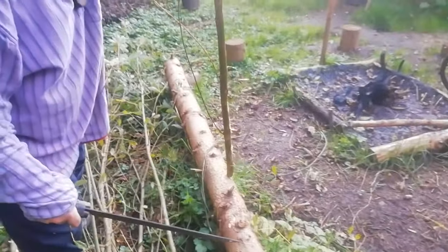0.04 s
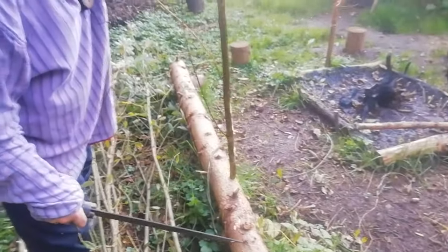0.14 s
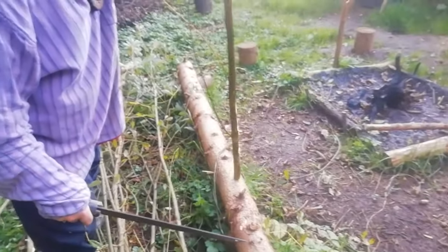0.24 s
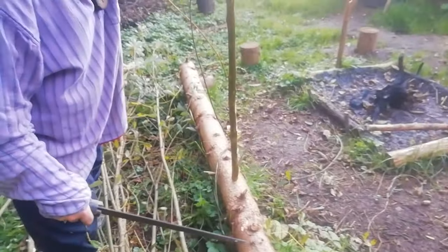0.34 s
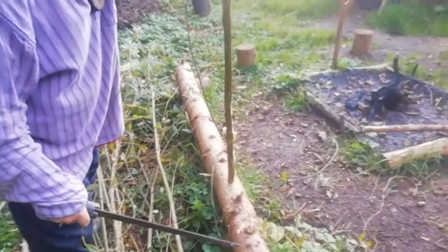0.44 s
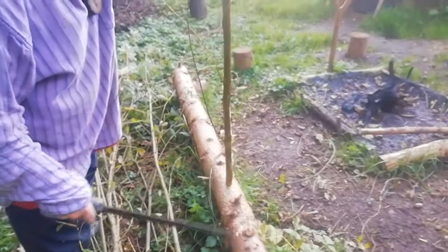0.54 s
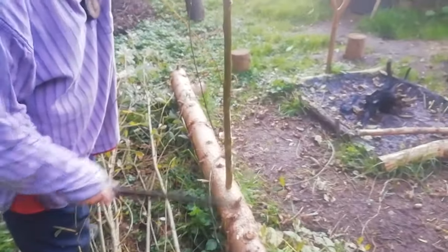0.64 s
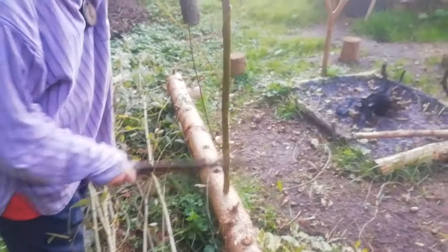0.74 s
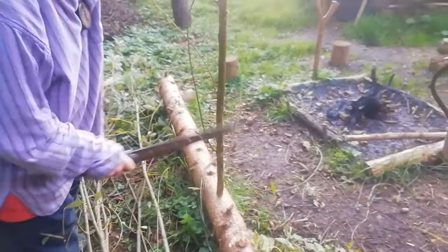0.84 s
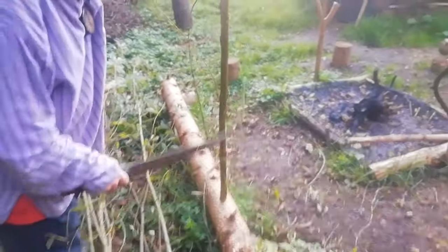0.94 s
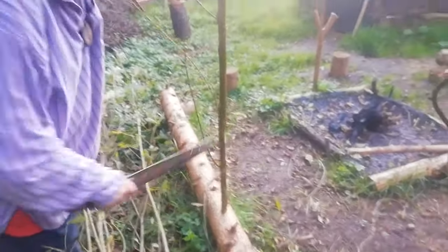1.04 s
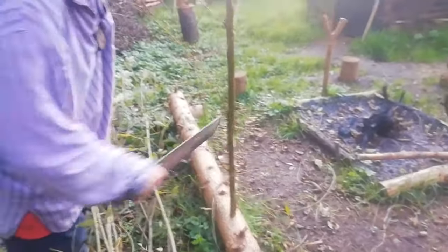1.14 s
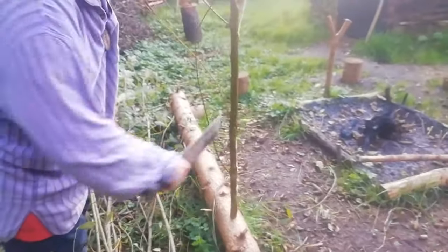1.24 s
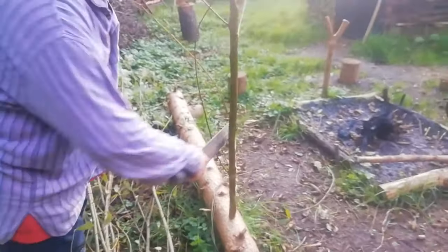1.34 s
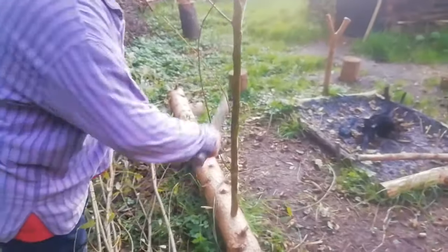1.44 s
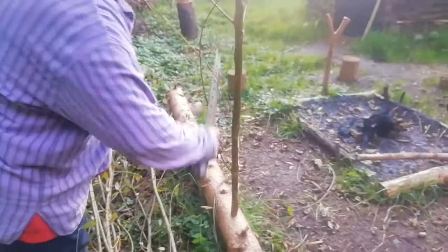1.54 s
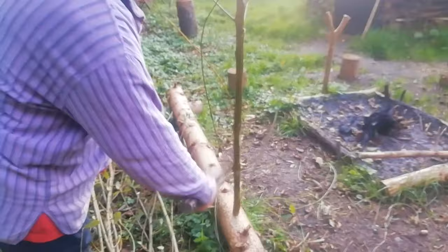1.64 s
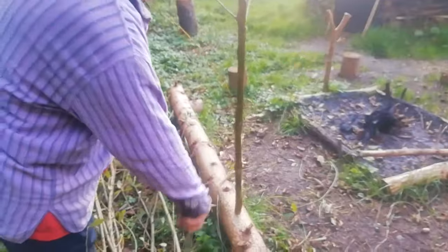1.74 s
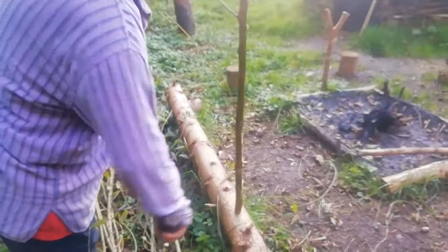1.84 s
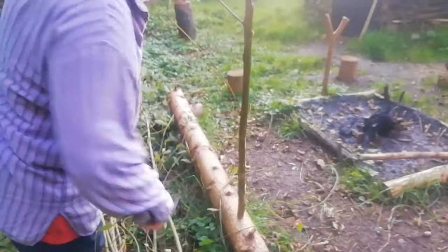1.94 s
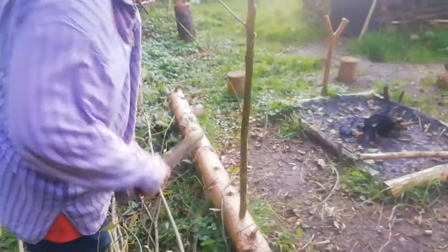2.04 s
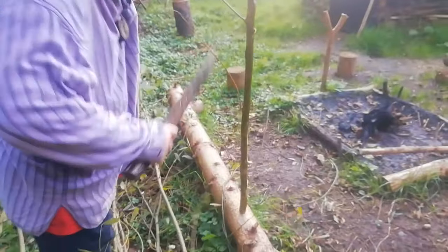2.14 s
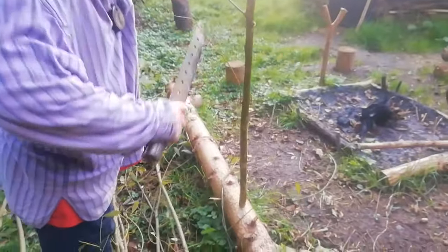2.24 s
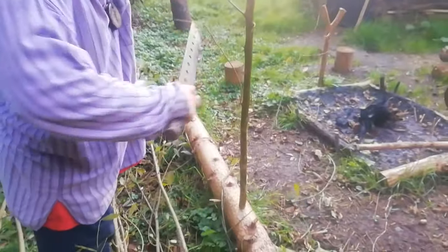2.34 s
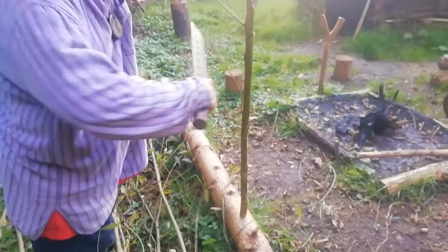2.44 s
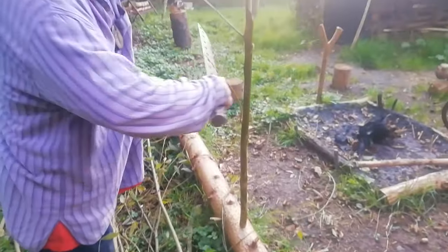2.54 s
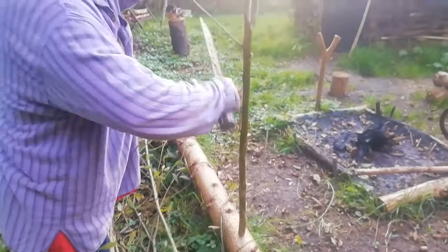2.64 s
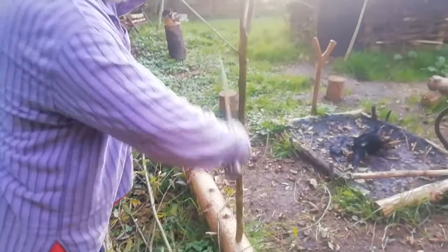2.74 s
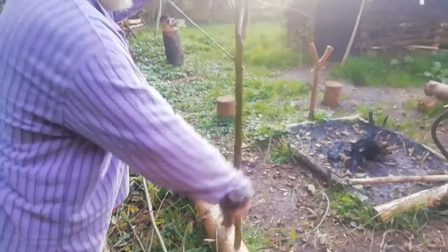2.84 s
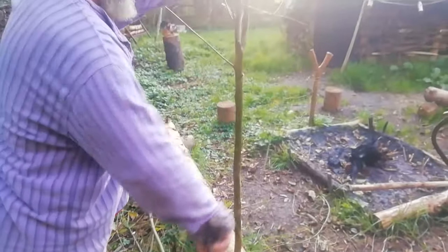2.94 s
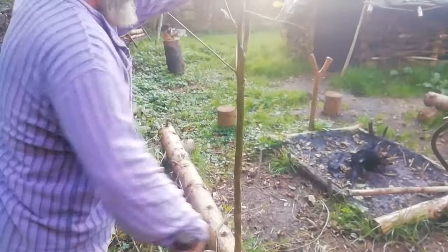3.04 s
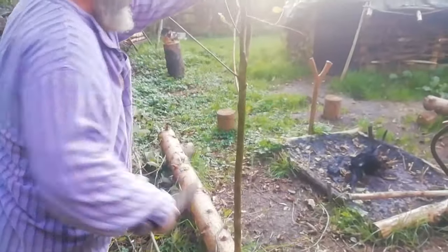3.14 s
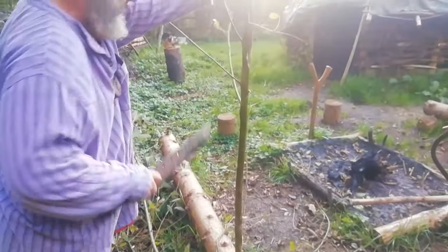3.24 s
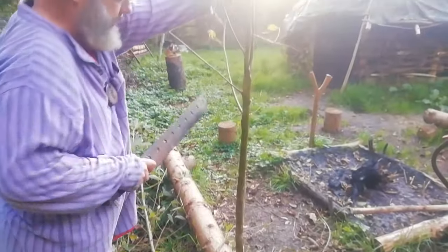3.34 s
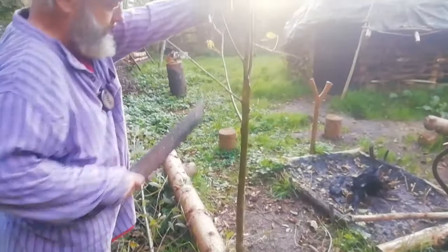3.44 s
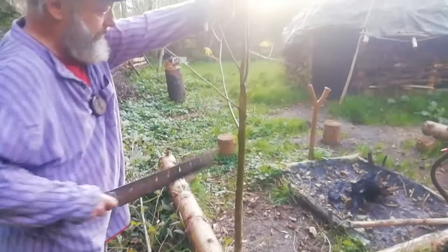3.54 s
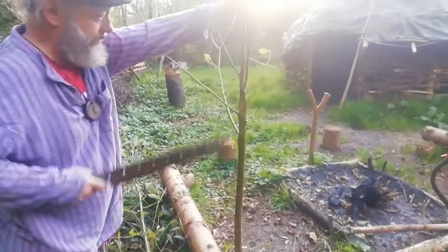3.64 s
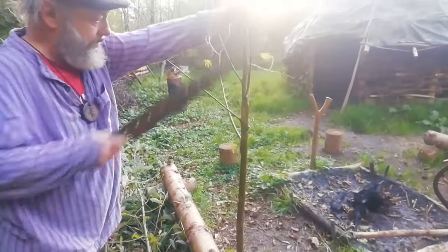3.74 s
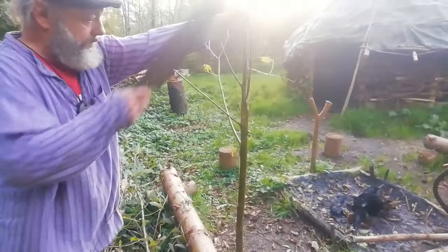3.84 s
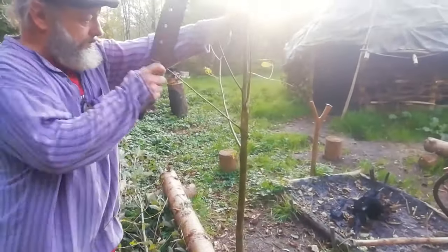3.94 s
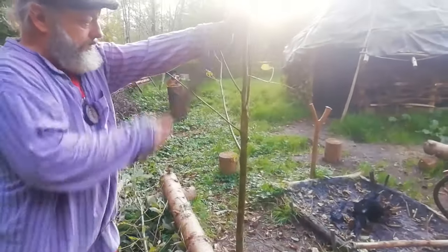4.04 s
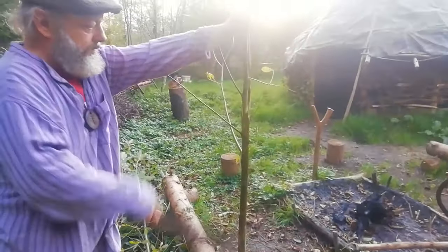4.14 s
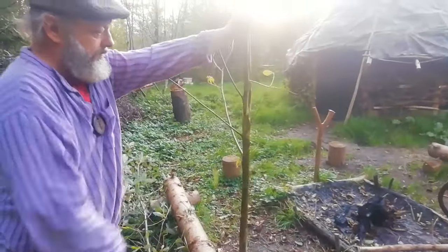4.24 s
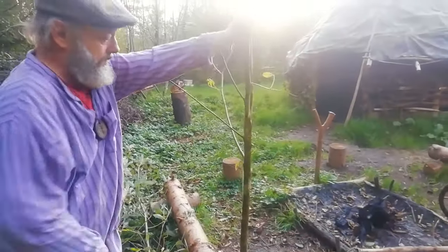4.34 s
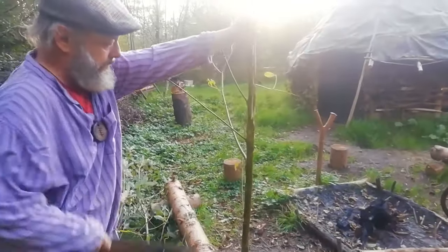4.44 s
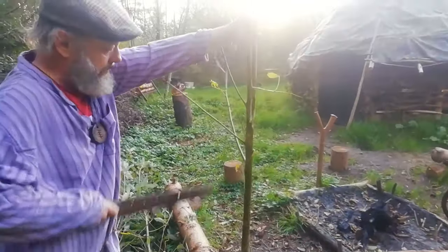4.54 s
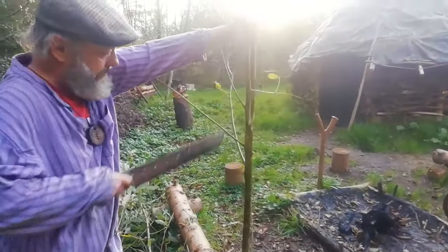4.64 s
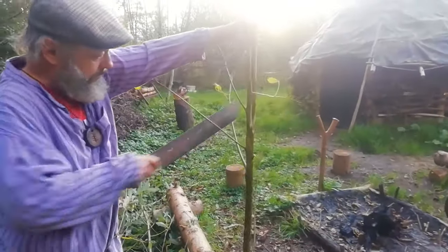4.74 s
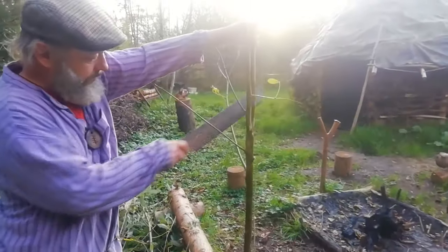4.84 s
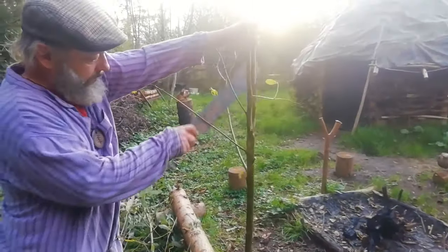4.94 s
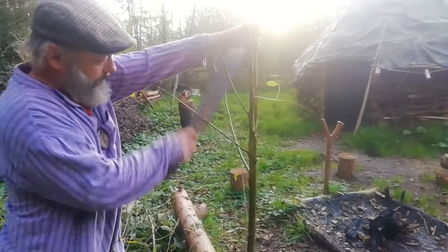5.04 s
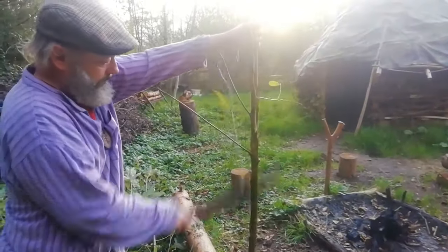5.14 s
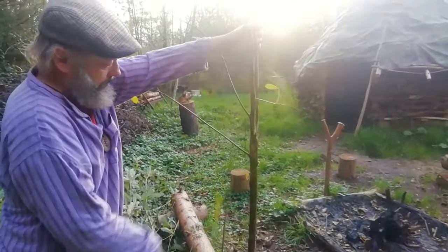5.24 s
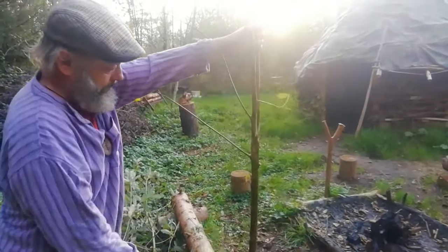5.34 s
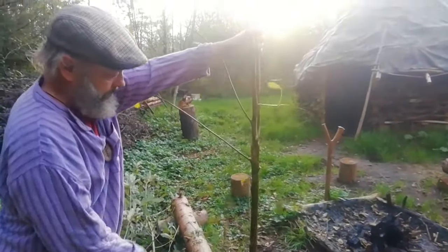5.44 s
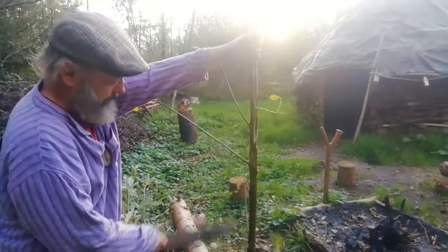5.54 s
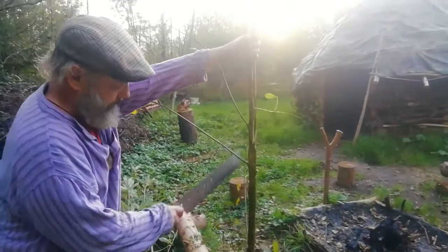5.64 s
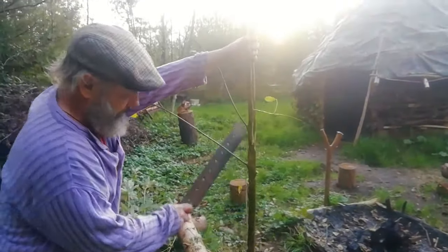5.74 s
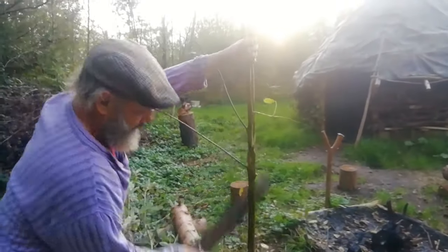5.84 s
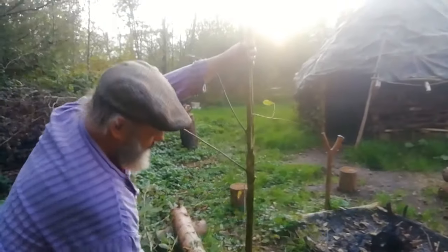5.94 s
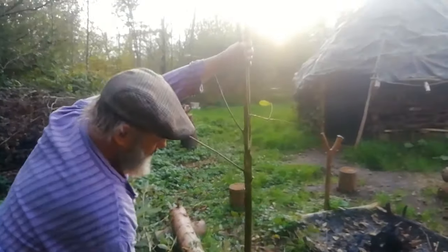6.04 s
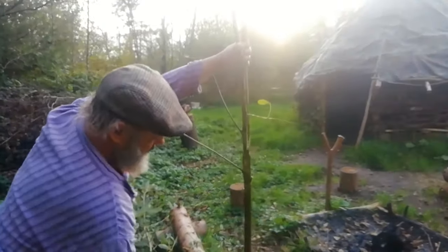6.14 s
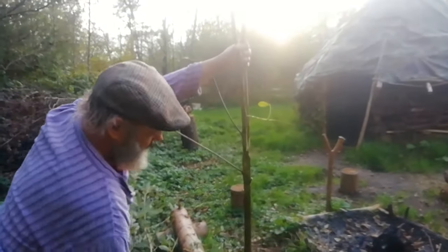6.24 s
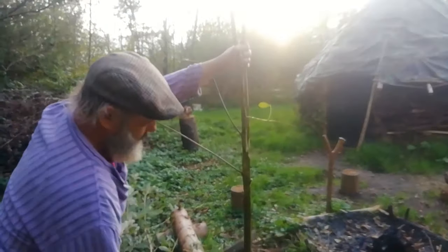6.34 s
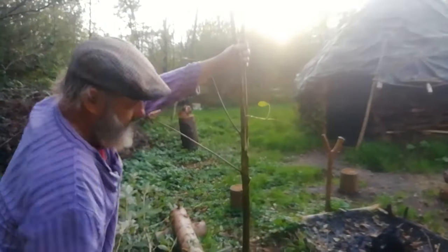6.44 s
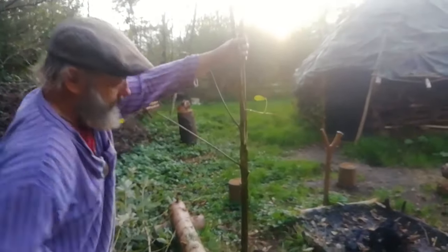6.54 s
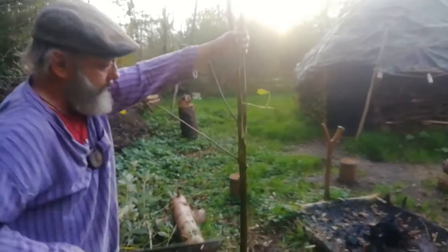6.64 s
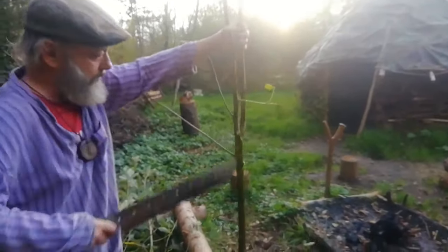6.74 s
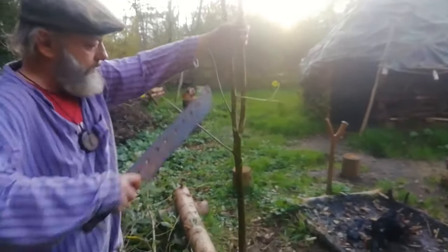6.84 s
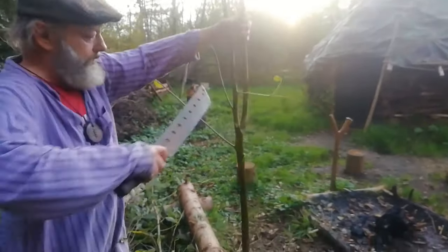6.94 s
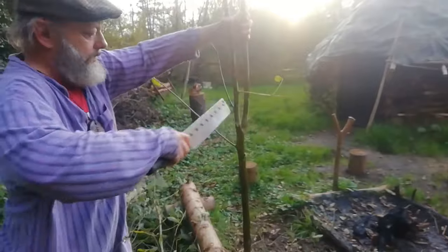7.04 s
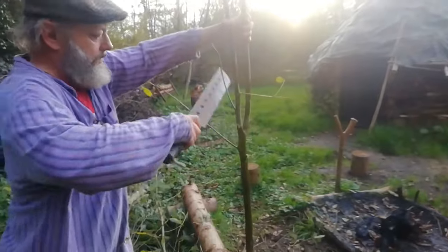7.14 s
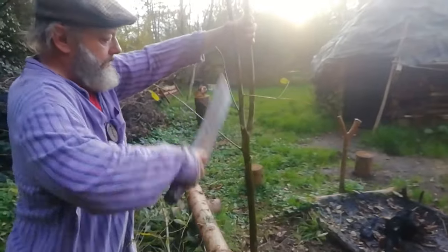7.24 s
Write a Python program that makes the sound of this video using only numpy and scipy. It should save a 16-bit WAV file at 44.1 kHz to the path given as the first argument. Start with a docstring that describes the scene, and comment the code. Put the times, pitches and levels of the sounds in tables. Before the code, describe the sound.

A machete lops branches off a fresh rod outdoors: sharp, bright wooden cracks about a second apart, with faint steel ring and ticking twigs.

```python
"""Machete lopping a willow rod

A machete chops side branches off a fresh rod about once a second: runs of fibre snaps, filtered.
The man's body throws each snap back. Blade, rod and dropped sticks ring as dying modes; lesser cracks
come from twigs and tearing fibres; shaken twigs tick; sticks crush litter.
Sleeve, leaves and shoes are swelling noise; a far bird whistles, an engine drones in garden air."""
import sys
import numpy as np
from scipy import signal
from scipy.fft import rfft, irfft
from scipy.io import wavfile

SR = 44100
rng = np.random.default_rng(int(sys.argv[2]) if len(sys.argv) > 2 else 0)


def to_wav(sig):
    """Store sig (one row per channel, or 1-D mono) as 16-bit WAV at the path in sys.argv[1].

    Samples outside -1..1 are clipped; the rate is SR.
    """
    pcm = np.clip(np.atleast_2d(sig), -1, 1) * 32767
    pcm = np.round(pcm).astype(np.int16)
    wavfile.write(sys.argv[1], SR, pcm.T)  # frames by channels


N = 322142

# Chops, a bite and then a break: break_s, fade_s, snap_db, crunch_db, thud_db, snap_left_right_db,
# snap_pitch_hz, crunch_pitch_hz, bite_lead_s, bite_snap_db, bite_crunch_db
CHOP_EVENTS = [(1.6745, 0.0044, -7.5, -27, -31, -1, 8400, 1313, .0045, -28.5, -16),
               (2.7955, 0.0072, -13.5, -24.5, -29, -7.5, 6440, 1900, 0.0061, -16.5, -29),
               (4.0827, 0.0026, -7.5, -21.5, -36, -4.5, 5325, 2100, 0.00094, -36.5, -38),
               (5.1647, 0.0029, -5, -15.5, -34.5, -4, 7400, 2150, .0028, -3.5, -12.5),
               (5.2084, 0.003, -9, -22.5, -34.5, -5.5, 7500, 1985, 0.014, -27, -37),
               (5.946, .008, -12.5, -27.5, -38, -8, 6900, 1700, .015, -20.5, -29.5),
               (5.984, .0035, -4.5, -20.5, -39.5, -1.5, 7270, 2700, .001, -28.5, -41.5),
               (7.2975, 0.0024, -6.5, -37.5, -41, -1, 8100, 2030, .004, -15.5, -31.5)]
# Spectra of a crack's three parts: freq_hz, level_db
THUD_SPECTRUM = [(70, -48), (150, 2.5), (260, 5.5), (450, -6.5), (750, -12.5), (1100, -19), (2500, -61)]
CRUNCH_SPECTRUM = [(350, -29.5), (700, -4), (1400, -1.5), (2100, -2), (2900, -2.5), (3700, -4), (5500, -34)]
SNAP_SPECTRUM = [(2500, -38.5), (3900, -16.5), (4900, -5), (5900, -6.5), (7000, -4.5), (8000, -3.5),
                 (9200, -4), (10300, -10.5), (11800, -15.5), (13300, -18.5), (16000, -25.5)]
# Lesser cracks: twigs struck or whipping back, fibres tearing: break_s, fade_s, snap_db, crunch_db,
# snap_left_right_db, snap_pitch_hz
LESSER_CRACKS = [(0.9447, 0.0027, -46, -52.5, 0, 7850), (1.3018, 0.0076, -49.5, -58, 1, 7300),
                 (1.803, 0.012, -29.5, -43.5, -5.5, 6200), (1.938, 0.015, -48.5, -53.5, -18, 7040),
                 (2.339, 0.0039, -46, -62.5, 0, 7800), (2.7845, 0.022, -23.5, -33.5, -22, 6800),
                 (2.9, 0.0021, -25.5, -43, -8, 7400), (2.9074, 0.013, -27, -41, -2.5, 7850),
                 (2.9732, .0054, -40.5, -56, -3, 6500), (3.003, .0026, -41, -53, -2, 7500),
                 (3.034, 0.0045, -38, -53, -1, 7620), (4.132, 0.0065, -28.5, -42, -2, 7960),
                 (4.1476, 0.0094, -23.5, -44, 0, 8660), (4.396, 0.0067, -35, -52, 4, 8650),
                 (4.4812, 0.0016, -35, -58.5, 6.5, 8750), (4.518, .007, -40.5, -49.5, -4, 8220),
                 (5.304, 0.004, -26.5, -43.5, -1.5, 8200), (5.329, 0.0019, -30, -30, -2.5, 8200),
                 (5.338, 0.019, -30, -39.5, -1.5, 8600), (5.367, .0033, -19, -35.5, -9, 6700),
                 (5.373, .012, -23, -33.5, -5, 6000), (5.4306, 0.014, -36, -52.5, -3, 7300),
                 (5.557, 0.02, -39.5, -56, -7, 7400), (5.5725, 0.02, -34, -47, -0.5, 6200),
                 (5.7873, 0.0015, -28.5, -40, -1.5, 5200), (5.9581, 0.013, -15, -31, -3, 7400),
                 (7.114, 0.0021, -47, -74, 9.5, 8470)]
# Sticks landing in leaf litter: start_s, ring_db, ring_tilt_db_per_octave, litter_db, litter_fade_s
STICK_LANDINGS = [(1.83, -61, -8, -41, .018), (4.294, -50.5, 4.5, -34, 0.0086),
                  (5.998, -26, 0.5, -21, 0.01), (6.168, -57, 14.5, -36, 0.027)]
# Loose stick modes: freq_hz, relative_db, t60_s
STICK_MODES = [(202, -31.5, .14), (402, 3, .11), (590, -18, .2), (807, -12, .19), (1023, -8, .06),
               (1254, -5, .05), (1405, -4, .055)]
# Low hollow knocks of rod and landing stick: start_s, level_db, tilt_db_per_octave
LOW_KNOCKS = [(1.672, -45.5, 7.5), (2.796, -30.5, 0.5), (4.083, -48.5, 8.5), (5.163, -39, 6),
              (5.209, -35.5, -2), (6.0, -27.5, 5)]
# Low knock modes: freq_hz, relative_db, t60_s
LOW_KNOCK_MODES = [(180, -17.5, 0.22), (247, -4.5, 0.056), (267, -0.5, 0.082), (404, -9.5, 0.22),
                   (591, -17, 0.26), (745, -19.5, .06)]
# Blows that ring the blade: start_s, level_db, t60_factor, favoured_hz
BLADE_BLOWS = [(1.672, -31, 1.2, 7560), (2.797, -35.5, 1.1, 6800), (2.908, -55, 1.12, 4750),
               (4.083, -33, .9, 5030), (4.083, -23, 0.42, 10970), (5.16, -31.5, 0.27, 7750),
               (5.21, -35, 1.0, 8440), (5.983, -42.5, 1, 7510), (7.298, -25, 0.88, 8530)]
# Blade modes, the lowest pair beating: freq_hz, relative_db, t60_s before each blow's factor
BLADE_MODES = [(4742, -3.5, .5), (4749.5, -10, .5), (4800, -2, .22), (6218, -6, .14), (6870, -5, .14),
               (7510, -2, .15), (7840, -6, .1), (8134, -1, .2), (8825, -3, .22), (9162, -4, .1),
               (10200, -10, .16), (10770, -12, .12)]
# Spectrum of small twigs ticking together: freq_hz, level_db
TICK_SPECTRUM = [(1000, -29), (2500, -15), (5000, -10.5), (7000, -8), (8400, -4), (9400, -4),
                 (11000, -12.5), (16000, -25.5)]
# Sleeve and leaf swells: peak_s, rise_s, fall_s, hiss_db, brush_db, left_right_db
RUSTLE_SWELLS = [(0.34, 0.057, 0.027, -56, -59.5, -1), (0.552, 0.12, 0.047, -47.5, -53, -2),
                 (0.972, 0.025, 0.055, -68, -60.5, -2), (1.419, 0.14, .05, -66, -67.5, -1),
                 (3.23, 0.17, 0.37, -61.5, -64.5, -3), (3.76, 0.16, 0.11, -44.5, -46, -0.5),
                 (4.52, 0.12, 0.088, -47, -57.5, 1), (4.77, 0.047, 0.051, -53, -73.5, 8),
                 (5.0, 0.047, 0.055, -57, -66.5, 3), (6.32, 0.047, 0.056, -58, -66, 7.5),
                 (6.68, 0.24, .25, -65, -91.5, 8), (7.12, 0.04, 0.13, -68, -87, 14)]
# Rustle spectra, fine and coarse: freq_hz, relative_db
HISS_SPECTRUM = [(4000, -37.5), (6300, -7), (7600, -1.5), (8700, 1.5), (9600, -7.5), (11000, -16),
                 (15500, -28.5)]
BRUSH_SPECTRUM = [(200, -48.5), (800, -8.5), (1600, 2), (2500, -5.5), (3800, -3), (5300, -0.5),
                  (6600, -0.5), (8500, -42), (14000, -23.5)]
# Shoes on damp soil: start_s, length_s, level_db
SHOE_SCUFFS = [(0.106, 0.097, -58.5), (0.387, 0.33, -59.5), (1.756, 0.18, -57.5), (1.959, 0.065, -54.5),
               (2.018, 0.073, -50.5), (2.09, 0.016, -51.5), (2.099, 0.067, -54.5), (2.167, 0.039, -56)]
# Scuff spectrum: freq_hz, relative_db
SCUFF_SPECTRUM = [(400, -49), (900, -10), (1300, 9), (1750, 6.5), (2300, -1), (3500, -28), (7000, -48)]
# Far bird's falling notes: start_s, length_s, start_hz, end_hz, level_db
BIRD_NOTES = [(5.515, 0.08, 2800, 1862, -63.5), (6.325, 0.07, 2270, 1780, -59)]
# Garden echo decay: freq_hz, t60_s
ECHO_DECAY = [(200, 0.14), (600, 0.31), (1500, 1), (4000, 1), (8000, 0.77), (14000, 0.95)]
# Garden air spectrum: freq_hz, relative_db_per_hz
AIR_SPECTRUM = [(82, -29), (140, 0.6), (234, -5), (309, -6), (362, -9), (593, -12), (1660, -10),
                (2880, -18), (6120, -17), (7910, -11), (8900, -13), (10900, -24), (14900, -28),
                (15800, -32)]
# Distant engine tones: freq_hz, rms_db before waver, waver_share
ENGINE_TONES = [(65, -51.5, 0.1), (162, -81, 0.72)]
# Treble colour of the two microphone ports: freq_hz, left_right_db
PORT_BALANCE = [(200, 13.5), (600, -7.5), (1500, -8.5), (2400, -4.5), (3300, 9), (4300, 1.5), (5600, -10),
                (6800, -4.5), (7900, 0), (8700, 12.5), (9700, 3.5), (11000, -1.5), (14500, -10)]
# Left-right likeness of steady noise: freq_hz, likeness_0_to_1
NOISE_LIKENESS = [(60, .96), (250, .85), (1000, .6), (3000, .35), (9000, .2)]

LEAD_SAMPLES = 200  # start of a crack to its break
BITE_SHARE = 0.29  # bite fade time / bite lead
BODY_ECHO_DELAY_S, BODY_ECHO_FADE_S = 0.0042, 0.02
BODY_ECHO_DB, BODY_ECHO_PAN_DB = -18, 9.5  # level against the snap; left-right
TWIG_CRUNCH_HZ, TWIG_THUD_DB = 1775, -16  # thud against crunch
STRAY_FROM_S, STRAY_TO_S = 0.033, 0.33
STRAY_MEAN_DB, STRAY_FADE_S = -44.5, 0.0025


def chops(bite_thud_db=-22, echo_crunch_db=-15, echo_thud_db=-24):
    """The edge bites, the branch snaps; the man's body throws the snap back from the left a moment later."""
    out = np.zeros((2, N))
    for (s, fade_s, snap_db, crunch_db, thud_db, pan_db, snap_hz, crunch_hz,
         lead_s, bite_snap_db, bite_crunch_db) in CHOP_EVENTS:
        start_s = s - LEAD_SAMPLES / SR
        bite = crack(BITE_SHARE * lead_s, bite_snap_db, bite_crunch_db, bite_crunch_db + bite_thud_db,
                     pan_db, snap_hz, crunch_hz)
        add(out, start_s - lead_s, bite)
        add(out, start_s, crack(fade_s, snap_db, crunch_db, thud_db, pan_db, snap_hz, crunch_hz))
        echo_db = snap_db + BODY_ECHO_DB
        body_echo = crack(BODY_ECHO_FADE_S, echo_db, echo_db + echo_crunch_db, echo_db + echo_thud_db,
                          BODY_ECHO_PAN_DB, snap_hz, crunch_hz)
        add(out, start_s + BODY_ECHO_DELAY_S, body_echo)
    return out


def crack(fade_s, snap_db, crunch_db, thud_db, pan_db, snap_hz, crunch_hz, peak_db=7, peak_octaves=0.23,
          crunch_peak_db=8, crunch_octaves=0.76, ripple_db=4):
    """Low thud, woody crunch and bright snap, each a fibre run through its own spectrum."""
    hz = abs(np.fft.fftfreq(2048, 1 / SR))
    fade_s = max(fade_s, 0.001)
    resonances = ripple_db * ripple(hz, spacing_hz=222.5)
    snap_peak = peak_db * bump(hz, snap_hz, peak_octaves)
    crunch_peak = crunch_peak_db * bump(hz, crunch_hz, crunch_octaves)
    thud = causal(read(THUD_SPECTRUM, hz), hz)
    snap = causal(read(SNAP_SPECTRUM, hz) + snap_peak + resonances, hz)
    crunch = causal(read(CRUNCH_SPECTRUM, hz) + crunch_peak + resonances, hz)
    thud_run = fibres(fade_s, per_s=4300, apart=0.043, linger_db=-25.0, linger_s=0.045)
    crunch_run = fibres(fade_s, per_s=5000, apart=1.0, linger_db=-25.0, linger_s=0.01)
    snap_run = fibres(fade_s, per_s=7500, apart=1.6, linger_db=-26.5, linger_s=0.025)
    parts = [(thud, thud_db, thud_run, -1.5),
             (crunch, crunch_db, crunch_run, -2.5),
             (snap, snap_db, snap_run, pan_db)]
    out = 0
    for colour, db, run, balance_db in parts:
        burst = signal.fftconvolve(run, colour, axes=1)
        burst /= np.linalg.norm(burst, axis=1, keepdims=True)
        # energy grows with fade time
        out = out + amp(db) * sides(balance_db) * burst * np.sqrt(fade_s * SR / 2)
    return out


def fibres(fade_s, per_s, apart, linger_db, linger_s, lead_fade_s=0.0095, size=4096):
    """Sparse fibre snaps around a break, dying away after it; each port hears some of its own."""
    t = (np.arange(size) - LEAD_SAMPLES) / SR
    snaps = rng.standard_normal((3, size)) * (rng.random((3, size)) < per_s / SR)
    snaps[0, LEAD_SAMPLES] += 1.4  # the break
    before = 0.035 * np.exp(-abs(t) / lead_fade_s)
    dying = np.exp(-abs(t) / fade_s) + amp(linger_db) * np.exp(-abs(t) / linger_s)
    return (snaps[0] + apart * snaps[1:]) * np.where(t < 0, before, dying)


def ripple(hz, spacing_hz):
    """Random peaks and dips along frequency: each piece of wood has its own close resonances."""
    knots_hz = np.arange(0, SR, spacing_hz)
    return np.interp(hz, knots_hz, rng.standard_normal(len(knots_hz)))


def twigs(stray_hz=7800, stray_crunch_db=-15, spread_db=3, pan_spread_db=4, count=2):
    """Lesser cracks of twigs and tearing fibres; stray bits tick down at random after each chop."""
    out = np.zeros((2, N))
    for s, fade_s, snap_db, crunch_db, pan_db, snap_hz in LESSER_CRACKS:
        lesser = crack(fade_s, snap_db, crunch_db, crunch_db + TWIG_THUD_DB, pan_db, snap_hz, TWIG_CRUNCH_HZ)
        add(out, s - LEAD_SAMPLES / SR, lesser)
    for s, *_ in CHOP_EVENTS:
        for when, size, side in rng.uniform(-1, 1, (count, 3)):
            delay_s = np.interp(when, [-1, 1], [STRAY_FROM_S, STRAY_TO_S])
            snap_db = STRAY_MEAN_DB + spread_db * size
            crunch_db = snap_db + stray_crunch_db
            stray = crack(STRAY_FADE_S, snap_db, crunch_db, crunch_db + TWIG_THUD_DB,
                          pan_spread_db * side, stray_hz, TWIG_CRUNCH_HZ)
            add(out, s + delay_s, stray)
    return out


def litter(crunch_db=-10, thud_db=-3.5, pan_db=-2.0, snap_hz=8200, crunch_hz=1150):
    """A falling stick thuds on the soil and crushes dry leaves."""
    out = np.zeros((2, N))
    for s, ring_db, _, leaves_db, fade_s in STICK_LANDINGS:
        crush = crack(fade_s, leaves_db, leaves_db + crunch_db, ring_db + thud_db, pan_db, snap_hz, crunch_hz)
        add(out, s - LEAD_SAMPLES / SR, crush)
    return out


def wood():
    """Hollow knocks of rod and landing sticks: dying modes."""
    out = np.zeros((2, N))
    for hits, modes in ((LOW_KNOCKS, LOW_KNOCK_MODES), (STICK_LANDINGS, STICK_MODES)):
        for s, db, tilt_db, *_ in hits:
            add(out, s, amp(db) * ring(modes, spread=0.16, tilt_db=tilt_db))
    return out * sides(-1.6)


def blade(favour_db=8, favour_octaves=0.17):
    """Steel sings on after each blow; the point of contact decides which modes stand out."""
    out = np.zeros((2, N))
    for s, db, stretch, favoured_hz in BLADE_BLOWS:
        modes = []
        for hz, mode_db, t60_s in BLADE_MODES:
            favour = bump(hz, favoured_hz, favour_octaves) - 0.5
            modes.append((hz, mode_db + favour_db * favour, t60_s))
        add(out, s, amp(db) * ring(modes, spread=1.0, stretch=stretch))
    return out * sides(-2.5)


def ring(modes, spread, stretch=1, tilt_db=0):
    """Exponentially dying modes, each reaching the two ports with a phase difference."""
    t = np.arange(SR * 3 // 4) / SR
    out = np.zeros((2, len(t)))
    for hz, db, t60_s in modes:
        phase = spread * rng.uniform(-np.pi, np.pi, (2, 1))
        level_db = db + tilt_db * np.log2(hz / modes[1][0])  # tilt pivots on the second mode
        decay = np.exp(-np.log(1000) * t / (t60_s * stretch))
        out += amp(level_db) * decay * np.sin(2 * np.pi * hz * t + phase)
    return out * (1 - np.exp(-t / 0.00032))  # soft onset


def shaken_twigs(blows, level_db=-27, settle_s=0.13, per_s=450, spread_db=4):
    """Each blow shakes twigs and leaves, which tick against each other as they settle."""
    keep = np.exp(-2 / (settle_s * SR))
    power = np.mean(blows ** 2, 0)
    shake = np.sqrt(signal.lfilter([1 - keep], [1, -keep], power))
    struck = rng.random(N) < per_s / SR
    tick_sizes = amp(spread_db * rng.standard_normal(N).clip(-2, 2))
    ticks = rng.standard_normal((2, N)) * struck * tick_sizes
    hz = abs(np.fft.fftfreq(2048, 1 / SR))
    coloured = signal.oaconvolve(ticks, causal(read(TICK_SPECTRUM, hz), hz), axes=1)[:, :N]
    return amp(level_db) * shake * unit(coloured)


def rustle(grain_db=1.0, stroke_db=2.03, catch_db=1.0, catch_hz=110):
    """Cloth and leaves rub: a fine uneven hiss, and a coarser brush that catches and slips."""
    t = np.arange(N) / SR
    hiss, brush = np.zeros((2, 2, N))
    for s, rise_s, fall_s, hiss_db, brush_db, pan_db in RUSTLE_SWELLS:
        swell = sides(pan_db) * np.exp(-abs(t - s) / np.where(t < s, rise_s, fall_s))
        hiss = np.maximum(hiss, amp(hiss_db) * swell)
        brush = np.maximum(brush, amp(brush_db) * swell)
    grain = unit(amp(grain_db * wander(hz=513) + stroke_db * wander(hz=35.6)))
    catching = unit(amp(catch_db * wander(hz=catch_hz)))
    return grain * (hiss * noise(HISS_SPECTRUM) + catching * brush * noise(BRUSH_SPECTRUM))


def scuffs(grain_db=1.5):
    """Shoes grind damp soil: soft gritty noise swells."""
    level = np.zeros((2, N))
    for s, length_s, db in SHOE_SCUFFS:
        add(level, s, amp(db) * np.sqrt(np.hanning(int(length_s * SR)).clip(0)))
    return level * unit(noise(SCUFF_SPECTRUM) * amp(grain_db * wander(hz=92)))


def bird():
    """Short whistles: sines whose pitch falls steeply, then levels off."""
    out = np.zeros((2, N))
    for s, length_s, start_hz, end_hz, db in BIRD_NOTES:
        u = np.linspace(0, 1, int(length_s * SR))
        hz = end_hz + (start_hz - end_hz) * (1 - u) ** 2.1
        add(out, s, amp(db) * np.sin(np.pi * u) * np.sin(2 * np.pi * np.cumsum(hz) / SR))
    return out


def garden(x, wet_db=-21, build_s=0.0053):
    """Ground, hut and trees scatter a faint tail of random echoes, different at each port."""
    taps = rng.standard_normal((2, SR)) * (rng.random((2, SR)) < 4000 / SR)
    hz, t, z = signal.stft(taps, SR, nperseg=256)
    decay = np.exp(-np.log(1000) * t / read(ECHO_DECAY, hz)[:, None])
    build = 1 - np.exp(-t / build_s)
    tail = signal.istft(z * decay * build, SR, nperseg=256)[1]
    return amp(wet_db) * signal.fftconvolve(x, tail / np.linalg.norm(tail[0]), axes=1)[:, :N]


def background(air_db=-64, rumble_db=-62):
    """Still air and low rumble as shaped noise; a far engine as wavering sines."""
    t = np.arange(N) / SR
    rumble = noise([(8, -8.5), (30, -4.5), (60, -0.5), (100, -11.0), (170, -28.5), (500, -66.5), (2000, -100)])
    drone = 0
    for hz, db, waver in ENGINE_TONES:
        level = amp(db) * np.sqrt(2) * (1 + waver * wander(hz=3.3))
        drone = drone + level * np.sin(2 * np.pi * hz * t + 0.5 * wander(hz=0.5))
    return amp(air_db) * noise(AIR_SPECTRUM) + amp(rumble_db) * rumble + drone


def noise(points):
    """Steady stereo noise of a given spectrum and rms 1, nearly mono in the bass."""
    hz = np.fft.rfftfreq(N, 1 / SR)
    a, b = rfft(rng.standard_normal((2, N)))
    same = read(NOISE_LIKENESS, hz)
    pair = np.array([a, same * a + np.sqrt(1 - same ** 2) * b])
    return unit(irfft(pair * amp(read(points, hz)), N))


def wander(hz):
    """A random curve of rms 1, rolled off above hz."""
    f = np.fft.rfftfreq(N, 1 / SR)
    return unit(irfft(rfft(rng.standard_normal(N)) / (1 + (f / hz) ** 4), N))


def causal(db, hz):
    """Minimum-phase stereo impulse response of a spectrum heard through the two ports."""
    log_gain = np.log(amp(db) * sides(read(PORT_BALANCE, hz)))
    return np.fft.ifft(np.exp(np.conj(signal.hilbert(log_gain)))).real[:, :len(hz) // 2]


def bump(hz, centre_hz, octaves):
    """A bell of height 1 around a frequency."""
    return np.exp(-0.5 * (np.log2((hz + 1) / centre_hz) / octaves) ** 2)


def read(points, hz):
    """Reads a spectrum table on a log-frequency axis."""
    f, value = np.transpose(points)
    return np.interp(np.log(hz + 1), np.log(f + 1), value)


def sides(db):
    """Left and right gains of equal total power for a left-right difference."""
    gains = np.array([amp(db / 2), amp(-db / 2)]).reshape(2, -1)
    return gains / np.sqrt(np.mean(gains ** 2, 0))


def add(mix, s, sound):
    """Adds a sound to the stereo mix at time s."""
    part = mix[:, max(round(s * SR), 0):][:, :sound.shape[-1]]
    part += sound[..., :part.shape[1]]


def amp(db):
    """Decibels to amplitude."""
    return 10 ** (np.asarray(db) / 20)


def unit(x):
    """Scales to rms 1."""
    return x / np.sqrt(np.mean(x ** 2) + 1e-20)


def scene():
    """Blows, rings and small sounds close by, their faint echo, rustle, and the garden behind."""
    blows = chops() + twigs() + litter()
    low_cut = signal.butter(4, 140, "high", fs=SR, output="sos")  # the close sounds carry no deep bass
    woody = signal.sosfilt(low_cut, blows + wood())
    near = woody + blade() + shaken_twigs(blows) + scuffs() + bird()
    return near + garden(near) + rustle() + background()


def record(dry, edge_hz=15950):
    """Hard limit near full scale, then a steep low-pass."""
    low_pass = signal.firwin(401, edge_hz, window=("kaiser", 9), fs=SR)
    return signal.oaconvolve(np.clip(dry, -0.95, 0.95), low_pass[None], "same")


dry = scene()
out = record(dry)
to_wav(out)
```